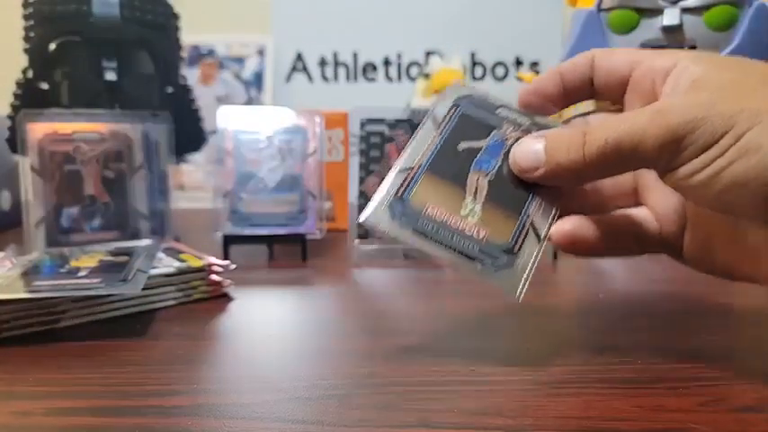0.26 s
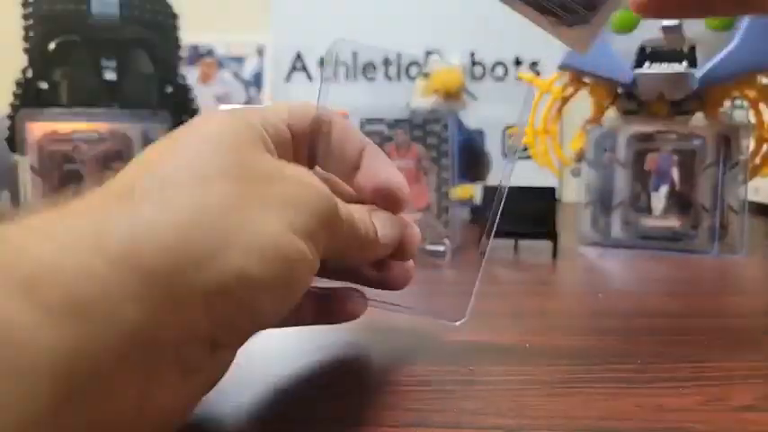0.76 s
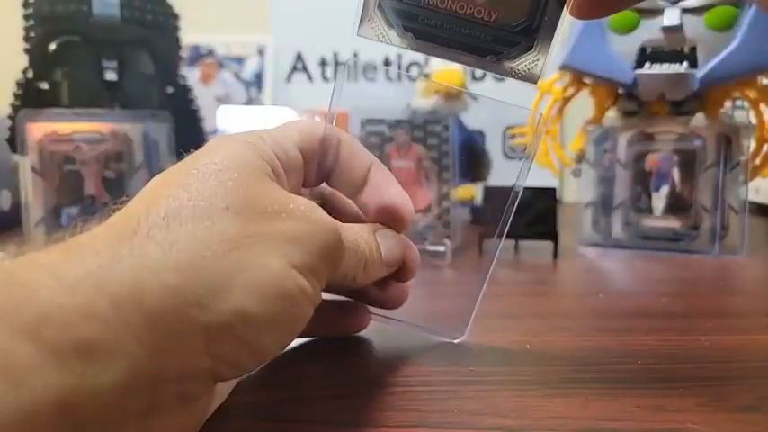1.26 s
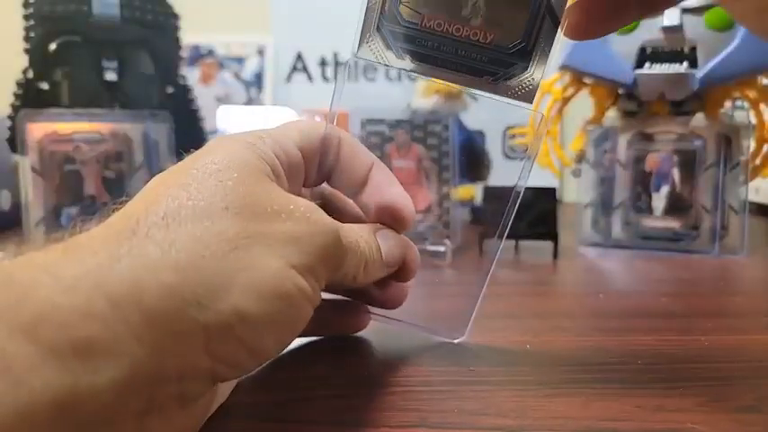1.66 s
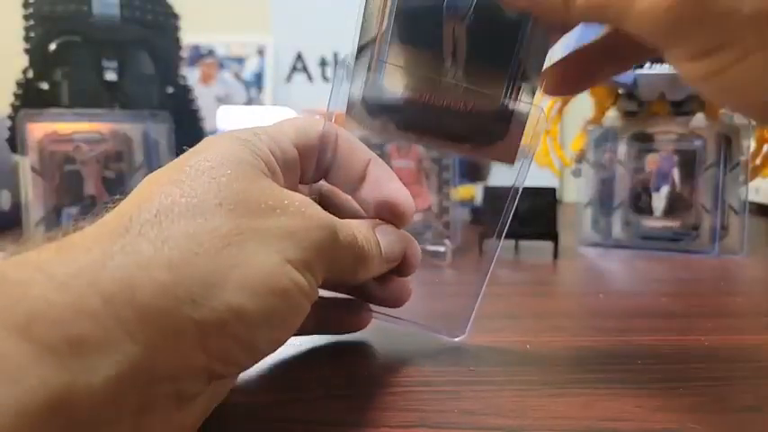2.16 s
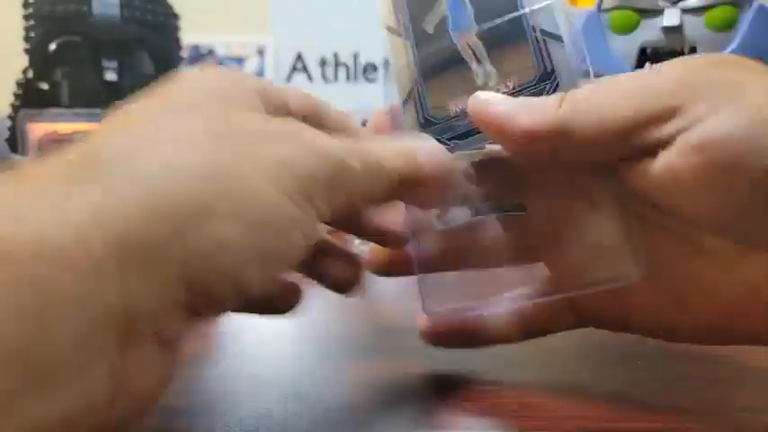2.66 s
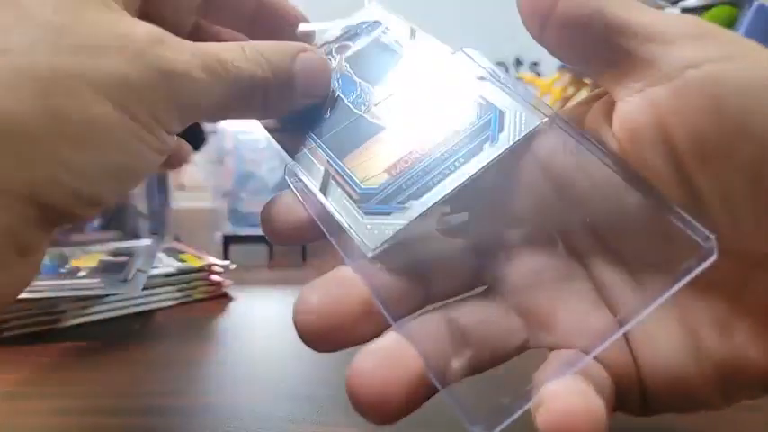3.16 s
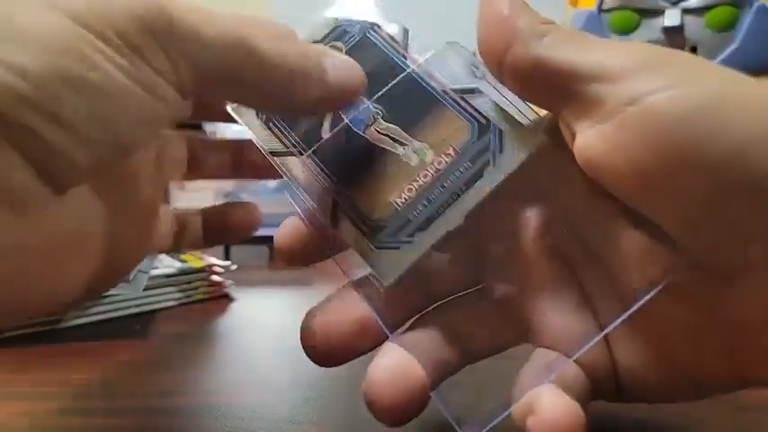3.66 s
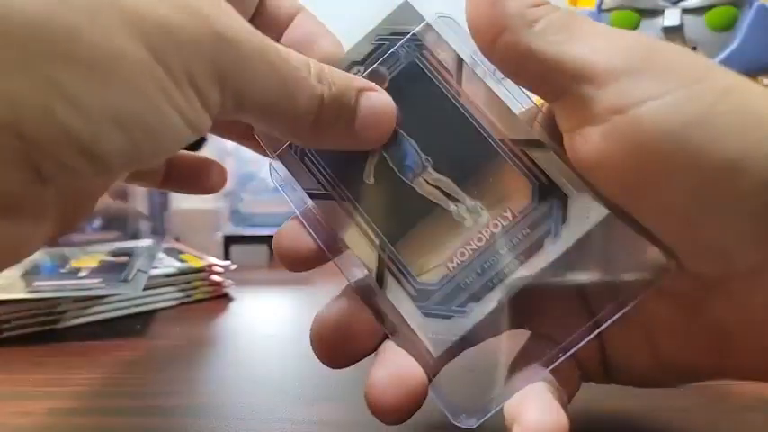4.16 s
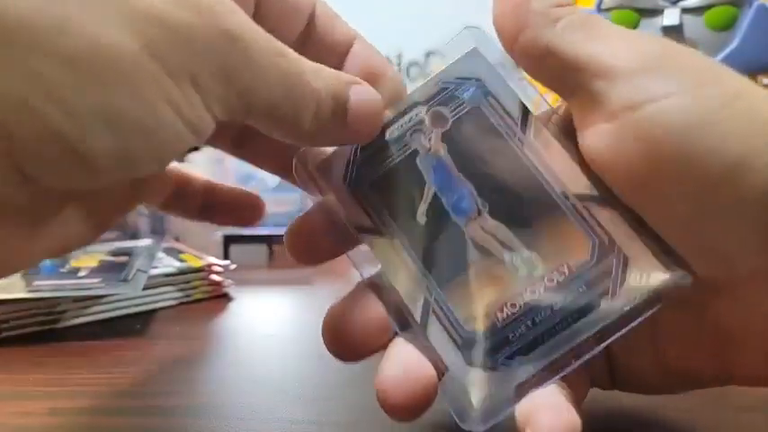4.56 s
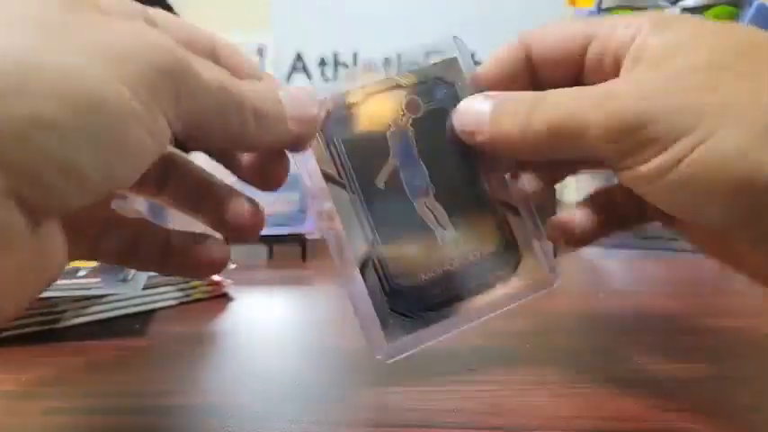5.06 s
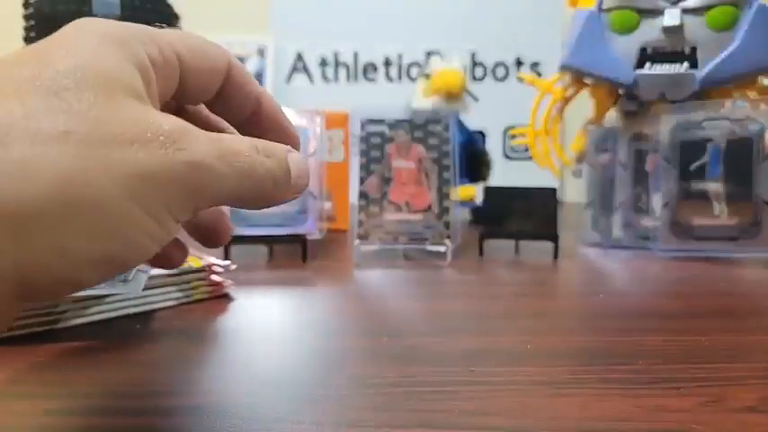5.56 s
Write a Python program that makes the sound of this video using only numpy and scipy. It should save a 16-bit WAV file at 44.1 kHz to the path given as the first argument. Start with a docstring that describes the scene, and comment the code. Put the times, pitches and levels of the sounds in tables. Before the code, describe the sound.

Close plastic handling: a short scrape with hard knocks, a pause, then crisp sleeve rubbing, faint ticks and two sharper snaps over low room hum.

```python
"""A stiff plastic holder scrapes off a table; then a sleeved card is slid into it near a two-port microphone.
Scrape and rubbing: stick-slip grains through resonances and coloured filters, patchy in time and frequency.
Ticks, knocks and snaps: a push rings the holder's modes under a burst of tiny slips; soft bumps: damped sines.
Underneath: a short echo of ticks and scrape, and low lumpy room noise with two hums."""
import sys
import numpy as np
from scipy import signal
from scipy.io import wavfile
from scipy.ndimage import uniform_filter1d, map_coordinates

SR = 44100
rng = np.random.default_rng(int(sys.argv[2]) if len(sys.argv) > 2 else 0)


def dump_mix(stems):
    """Bounce the given channels to the path in sys.argv[1] as a 16-bit WAV at rate SR."""
    frames = np.atleast_2d(stems).T  # one column per channel
    limited = np.clip(frames, -1, 1)  # hard clip at full scale
    pcm = np.round(limited * 32767).astype(np.int16)
    wavfile.write(sys.argv[1], SR, pcm)


def invert_db(level):
    """Linear amplitude ratio for a level in decibels (20 dB per decade), elementwise."""
    return 10 ** (np.asarray(level, dtype=float) / 20)


N = 256304  # samples


def evened(x):
    """Scale to unit rms."""
    return x / np.sqrt(np.mean(x ** 2) + 1e-20)


def read(points, hz):
    """Interpolate a (frequency, value) table over log frequency."""
    f, value = np.transpose(points)
    return np.interp(np.log(hz + 1), np.log(f + 1), value)


def add(mix, start_s, sound):
    """Add a sound in place, cut at the end of the mix."""
    part = mix[:, round(start_s * SR):][:, :sound.shape[1]]
    part += sound[:, :part.shape[1]]


def colour(points):
    """Causal (minimum-phase) impulse response with the given spectrum."""
    log_gain = np.log(invert_db(read(points, abs(np.fft.fftfreq(2048, 1 / SR)))))
    spectrum = np.exp(log_gain - 1j * signal.hilbert(log_gain).imag)
    return np.fft.ifft(spectrum).real[:512]


def ports(pair, same):
    """Two signals of given likeness from two unrelated ones."""
    other = np.sqrt(1 - np.clip(same, -1, 1) ** 2)
    return np.array([pair[0], same * pair[0] + other * pair[1]])


def slips(spread_db, clump_db, clump_ms):
    """Dense stick-slip grains of uneven size that come in clumps."""
    size_db = spread_db * np.minimum(rng.exponential(1, N), 4)
    grains = rng.standard_normal((2, N)) * invert_db(size_db)
    clumps = uniform_filter1d(rng.standard_normal(N), round(clump_ms * SR / 1000))
    return grains * invert_db(clump_db * evened(clumps))


# rubbing strokes: (start [s], end [s], hiss at start [dB], hiss at end [dB], grip: stiff faces over hiss [dB])
STROKE_TABLE = [(0.23, 0.36, -49.5, -85, -0.5), (0.399, 0.437, -66, -60.5, 2),
                (0.48, 0.503, -63, -64.5, 3.5), (0.535, 0.591, -59, -65, 2), (.658, 0.835, -67, -86.5, 1),
                (1.845, 2.05, -92, -79.5, -7.5), (2.054, 2.148, -75.5, -70, 1),
                (2.153, 2.319, -61, -61, -3.5), (2.387, 2.411, -65.5, -56, -4.5),
                (2.45, 2.53, -69, -71, -1.5), (2.541, 2.624, -66, -67, -5), (2.719, 2.741, -60.5, -55, 5.5),
                (2.796, 2.893, -73, -73, 0.5), (2.914, 4.9, -80, -83, 0.5), (3.105, 3.145, -66.5, -77, 1),
                (3.142, 3.321, -71.5, -47.5, 3.5), (3.586, 3.677, -61.5, -62, -2.5),
                (3.718, 3.867, -62.5, -61.5, -3.5), (4.057, 4.164, -73, -60, -2),
                (4.193, 4.28, -71, -70, 1.5), (4.285, 4.363, -69, -63, 0),
                (4.421, 4.515, -65.5, -63.5, 0.5), (4.54, 4.643, -71, -96, 4),
                (4.918, 5.039, -64.5, -64, 0), (5.098, 5.146, -65.5, -65.5, -4.5),
                (5.16, 5.224, -79, -71, -3.5), (5.256, 5.465, -71.5, -58, 0), (5.515, 5.802, -82, -83, -7),
                (0.31, 0.707, -72, -78, 7), (3.497, 3.57, -76, -74, 0.5), (4.976, 5.03, -66, -87, 9),
                (4.737, 4.74, -66, -51, 6)]
START_DB_PER_S, STOP_DB_PER_S = 896.5, 449  # onset and decay slopes of a stroke


def strokes():
    """Hiss gain and grip [dB] over time: strokes set in fast, drift, die away; the loudest rules the grip."""
    t = np.arange(0, N + 64, 64) / SR
    start, end, first_db, last_db, grip_db = np.transpose(STROKE_TABLE)[:, :, None]
    db = first_db + (last_db - first_db) * np.clip((t - start) / (end - start), 0, 1)
    db -= START_DB_PER_S * np.maximum(start - t, 0)
    db -= STOP_DB_PER_S * np.maximum(t - end, 0)
    power = invert_db(np.maximum(db, -120)) ** 2
    hiss = np.sqrt(power.sum(0))
    grip_db = (power * grip_db).sum(0) / hiss ** 2
    now = np.arange(N) / SR
    return np.interp(now, t, hiss), np.interp(now, t, grip_db)


# holder's short rings: (frequency [Hz], relative level [dB], t60 [s])
HOLDER_MODES = [(589, 2.5, 0.0087), (733, 3, 0.029), (942, 6.5, 0.017), (1069, 5.5, 0.022),
                (1248, 10, 0.013), (1567, 15.5, 0.01), (2010, -11, 0.0037), (2350, -2, .008),
                (2900, 0.5, 0.0085), (3300, -36.5, .01)]


def rings(centre_hz, octaves, spot_db):
    """Impulse response of the holder's modes, weighted towards the centre: -6 dB at the given octaves."""
    t = np.arange(3000) / SR
    hz, db, t60 = np.transpose(HOLDER_MODES)[:, :, None]
    near_db = -6 * (np.log2(hz / centre_hz) / octaves) ** 2
    decay = invert_db(db + near_db + spot_db - 60 * t / t60)
    return (decay * np.sin(2 * np.pi * hz * t)).sum(0)


# crackle of the stiff faces: (frequency [Hz], relative level [dB])
FACE_COLOUR = [(1300, -22.5), (1900, 1.5), (2700, 1.5), (3800, 3), (5000, 2.5), (6500, -3.5), (9000, -26.5)]
# crackle of the thin sleeve: (frequency [Hz], relative level [dB])
SLEEVE_COLOUR = [(3000, -22.5), (4500, -26.5), (5800, 10), (7000, 16), (8800, 18.5), (10300, 10.5),
                 (12500, 12), (14500, -17.5)]
BODY_DB, BODY_DB_PER_GRIP_DB = -5.5, 0.78  # holder body over hiss


def rubbing():
    """Sleeve slips against the holder; a harder grip brings up the stiff faces and the body."""
    grains = slips(0.83, 1.3, 3.8)
    hiss, grip_db = strokes()
    body_db = BODY_DB + BODY_DB_PER_GRIP_DB * grip_db
    layers = [(colour(SLEEVE_COLOUR), .6, 0),  # (kernel, likeness, dB over hiss)
              (colour(FACE_COLOUR), .7, grip_db),
              (rings(1300, 1.2, 0), .85, body_db)]
    total = np.zeros((2, N))
    for kernel, same, db in layers:
        layer = signal.oaconvolve(ports(grains, same), kernel[None])[:, :N]
        total += invert_db(db) * evened(layer)
    return hiss * total


# ticks and snaps: (time [s], ring peak before scatter [dB], crack over ring [dB],
# sleeve edge over crack [dB], ring centre [Hz])
TICK_TABLE = [(0.0455, -30, -17, -1, 1910), (0.1743, -17.5, -8, -12.5, 1500), (0.922, -19, -22, -40, 615),
              (1.0153, -21.5, -19.5, -42, 900), (2.141, -59, 17, -16, 1500), (2.337, -34.5, -4, -1, 990),
              (2.3399, -29.5, -2, -32, 740), (2.4196, -38, -6.5, 0, 970), (2.6271, -41.5, 0.5, 4.5, 735),
              (2.6503, -43, -0.5, -10, 1200), (2.7163, -38, -21, -15, 1090), (2.7385, -37, -15, -14, 1300),
              (2.749, -37.5, 2, -35, 1150), (3.3172, -45, 6, -8, 1720), (3.332, -45.5, 4, 7.5, 1050),
              (3.3991, -32.5, 1, 8, 890), (3.7069, -41, 3.5, 13, 555), (3.8608, -37.5, 8, 5.5, 1640),
              (3.8873, -18, 0, 7, 700), (3.9476, -34, 0, 9, 730), (3.9538, -40, 12.5, -3.5, 708),
              (4.108, -44, -8, -12, 735), (4.1569, -47.5, 4.5, -7, 970), (4.3919, -43, 5, -34, 626),
              (4.566, -45.5, -9.5, 4.5, 552), (4.7282, -33, -9, -3, 884), (4.739, -23.5, -0.5, 6.5, 1020),
              (4.7452, -39, 11, -17, 2020), (5.0046, -39.5, -14, 6.5, 780), (5.0915, -48.5, -7, 9, 525),
              (5.1083, -46, -7, 8, 586), (5.1368, -46.5, 1, -25, 990), (5.2346, -35.5, -5, -5, 880),
              (5.802, -37, -2.5, 2.5, 1170)]
CHATTER_MS, PUSH_MS = 1, 1.7  # time scale of the slips; delay of the push
SCATTER_DB = 4.5  # std of left-right difference


def tick(sharp, dull, body_db, crack_db, edge_db, centre_hz):
    """A few ms of tiny slips swell and die in both plastics; one push sets the holder ringing."""
    age = 1000 * np.arange(1500) / SR / CHATTER_MS
    chatter = rng.standard_normal((2, 1500)) * (rng.random(1500) < .3)
    chatter = chatter * age ** 2 * np.exp(-age)
    contact = 8.9 * centre_hz * np.arange(300) / SR
    push = -np.diff(contact ** 2 * np.exp(-contact), prepend=0)  # sudden load, let go more slowly
    spot_db = 2 * rng.standard_normal((len(HOLDER_MODES), 1))
    body = signal.fftconvolve(push, rings(centre_hz, 0.97, spot_db))
    body = np.pad(body, (round(PUSH_MS * SR / 1000), 0))[:3000]
    sound = np.array([body, body]) / abs(body).max()
    for db, kernel, same in ((crack_db, dull, .6), (crack_db + edge_db, sharp, .4)):
        crack = signal.fftconvolve(ports(chatter, same), kernel[None])
        sound[:, :crack.shape[1]] += invert_db(db) * crack / abs(crack).max()
    pan_db = SCATTER_DB * rng.standard_normal()
    return sound * invert_db([[body_db + pan_db / 2], [body_db - pan_db / 2]])


# holder dragged off the table: (time [s], effort [dB], lift [0-1])
DRAG_PATH = [(0, -47, 0), (.04, -45, 0.17), (.06, -42.5, 0.06), (0.101, -41, .3), (0.137, -37.5, .4),
             (.155, -29, 0.06), (0.174, -45, 0.7), (0.179, -22.5, .15), (0.189, -32, 0.69),
             (.217, -33.5, 0.94), (.235, -56, 0.9), (.26, -66, 0.87), (.3, -80, 0.85)]
# resonances of the half-lifted sheet: (frequency [Hz], width [Hz])
SHEET_RINGS = [(890, 58), (1800, 420)]
# gritty noise: (frequency [Hz], relative level [dB])
GRIT_COLOUR = [(120, -33), (300, -8), (450, -20.5), (2300, 5.5), (3800, 1), (6200, -9), (9800, -10.5),
               (12500, -38)]
# low ring, high ring, grit: (level over effort when flat [dB], when lifted [dB])
DRAG_LAYERS = [(1, -4), (1, -7.5), (-8, 1.5)]


def drag():
    """Slips against the table top ring two broad resonances over gritty noise, until the holder lifts."""
    grains = ports(slips(2.2, 2.5, 5), 0.8)
    t, now = np.arange(2000) / SR, np.arange(N) / SR
    kernels = [np.exp(-np.pi * width * t) * np.sin(2 * np.pi * hz * t) for hz, width in SHEET_RINGS]
    kernels.append(colour(GRIT_COLOUR))
    s, effort_db, lift = np.transpose(DRAG_PATH)
    total = np.zeros((2, N))
    for kernel, (flat_db, lifted_db) in zip(kernels, DRAG_LAYERS):
        db = np.interp(now, s, effort_db + flat_db + (lifted_db - flat_db) * lift)
        total += invert_db(db) * evened(signal.oaconvolve(grains, kernel[None])[:, :N])
    return (now < s[-1]) * total


# soft bumps of a hand reaching the microphone through the table: (time [s], peak [dB], frequency [Hz])
BUMP_TABLE = [(2.753, -27.5, 113), (3.888, -31, 259.2), (4.743, -33, 248)]


def bump(db, hz):
    """One damped low swing, alike in both ports."""
    turns = hz * np.arange(2000) / SR
    swing = -np.sin(2 * np.pi * turns) * np.exp(-1.5 * turns) * np.minimum(8 * turns, 1)
    return invert_db(db) * swing / abs(swing).max() * np.ones((2, 1))


def bending(x, patchy_db, width_hz, length_ms):
    """Random gain patches in time and frequency: resonances and dips come and go as sheets bend in the hand."""
    z = signal.stft(x, SR, nperseg=512, noverlap=384)[2]
    patches = rng.standard_normal(z.shape[1:])  # shared by both ports
    bins, frames = width_hz * 512 / SR, length_ms * SR / 128000
    for size, axis in ((bins, 0), (frames, 1)):
        patches = uniform_filter1d(patches, max(round(size), 1), axis)
    z = z * invert_db(patchy_db * evened(patches))
    return signal.istft(z, SR, nperseg=512, noverlap=384)[1][:, :N]


# lead of the left port, negative when the right hears first: (time [s], lead [ms])
LEFT_LEAD = [(0, .39), (.7, .39), (.85, .02), (2.9, .02), (3.05, .15), (3.65, .15), (3.7, 0), (5.25, 0),
             (5.33, -.48), (5.6, -.48), (5.75, .32)]


def sideways(x):
    """Arrival-time difference: the right port is delayed by the left port's lead."""
    s, lead_ms = np.transpose(LEFT_LEAD)
    at = np.arange(N)
    late = at - np.interp(at / SR, s, lead_ms) * SR / 1000
    return np.array([x[0], map_coordinates(x[1], [late], order=3)])


# echo decay: (frequency [Hz], t60 [s])
ROOM_DECAY = [(300, 0.092), (1000, 0.19), (3000, 0.19), (8000, 0.12), (13000, 0.12)]
# likeness of the ports in echo and rumble: (frequency [Hz], left-right correlation [-1 to 1])
PORT_LIKENESS = [(60, 0.93), (130, 0.95), (280, 0.99), (600, 0.53), (1300, -0.73), (2810, 0.00076),
                 (6080, -0.54), (13100, -0.4)]


def room(x):
    """Walls answer after a few ms: sparse taps of random sign, each band dying at its own speed."""
    taps = np.zeros((2, SR // 2))
    jitter = rng.integers(0, 20, (2, (SR // 2 - 101) // 20))
    at = np.arange(100, SR // 2 - 20, 20) + jitter
    np.put_along_axis(taps, at, rng.choice([-1., 1.], at.shape), 1)
    hz, t, z = signal.stft(taps, SR, nperseg=128)
    z = ports(z, np.clip(read(PORT_LIKENESS, hz), -1, 1)[:, None])
    decay = invert_db(-60 * t / read(ROOM_DECAY, hz)[:, None])
    tail = signal.istft(z * decay, SR, nperseg=128)[1]
    return signal.fftconvolve(x, tail / np.linalg.norm(tail[0]), axes=1)[:, :N]


# noise spectrum: (frequency [Hz], relative density [dB per Hz])
RUMBLE_COLOUR = [(20, -31.5), (43, -23), (63, -11), (100, -14.5), (131, -15), (150, -18.5), (220, -15),
                 (246, -21.5), (341, -15), (447, -27), (1010, -33), (1570, -47.5), (3000, -53),
                 (13500, -53)]
# wavering hums: (frequency [Hz], width [Hz], relative density [dB per Hz])
RUMBLE_HUMS = [(81.15, 11.1, 1.5), (122, 12, -8.5)]
# port balance: (frequency [Hz], left over right [dB])
PORT_BALANCE = [(60, 0), (180, 0), (520, -1), (1520, -8), (4470, 2), (13100, 7)]
RUMBLE_DB = -49.5  # rms


def rumble():
    """Distant machinery and air: low lumpy noise over faint hiss."""
    frames, hz = N // 512 + 6, np.fft.rfftfreq(2048, 1 / SR)
    real, imag = rng.standard_normal((2, 2, len(hz), frames))
    z = ports(real + 1j * imag, read(PORT_LIKENESS, hz)[:, None])
    patches = rng.standard_normal((len(hz), frames))
    patches = evened(uniform_filter1d(uniform_filter1d(patches, 4, 0), 6, 1))
    hums = sum(invert_db(db) / (1 + (2 * (hz - f) / width) ** 2) for f, width, db in RUMBLE_HUMS)
    z *= (invert_db(read(RUMBLE_COLOUR, hz)) + hums)[:, None] * invert_db(1.28 * patches)
    z *= invert_db(np.outer([.5, -.5], read(PORT_BALANCE, hz)))[:, :, None]
    noise = signal.istft(z, nperseg=2048, noverlap=1536)[1][:, :N]
    return invert_db(RUMBLE_DB) * evened(noise)


def scene():
    """Hands and plastic near the microphone, an echo of ticks and scrape, and the room noise."""
    hits, bumps = np.zeros((2, N)), np.zeros((2, N))
    sharp, dull = colour(SLEEVE_COLOUR), colour(FACE_COLOUR)
    for s, *row in TICK_TABLE:
        add(hits, s, tick(sharp, dull, *row))
    for s, *row in BUMP_TABLE:
        add(bumps, s, bump(*row))
    scrape = bending(drag(), 2.6, 250, 40)
    rub = bending(rubbing(), 4.04, 250, 70)
    near = sideways(hits + scrape + rub)
    echo = room(sideways(invert_db(-5) * hits + invert_db(-10) * scrape))
    echo = bending(echo, 2.2, 300, 40)  # patchy too
    return near + echo + bumps + rumble()


def band_limit(x):
    """A steep low-pass at the top of the band."""
    return signal.sosfilt(signal.butter(12, 13720, fs=SR, output="sos"), x)


def record(dry):
    """The top of the band is shelved down steeply, by 19 dB above 13.2 kHz."""
    low = signal.oaconvolve(dry, signal.firwin(255, 13200, fs=SR)[None], "same")
    mix = low + invert_db(-19.0) * (dry - low)
    return band_limit(mix)


dry = scene()
out = record(dry)
dump_mix(out)
```